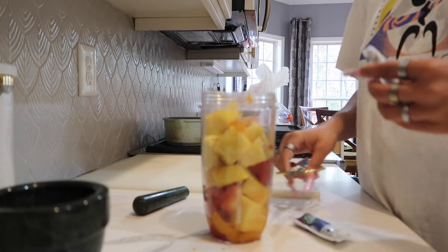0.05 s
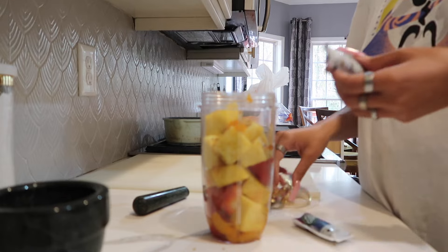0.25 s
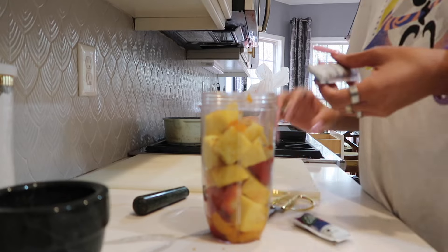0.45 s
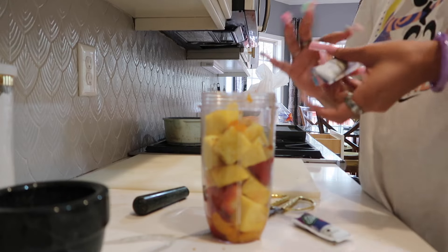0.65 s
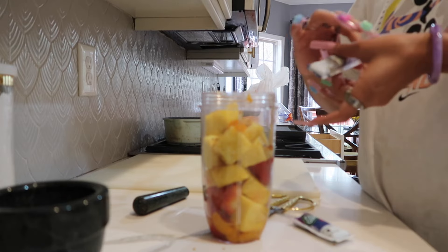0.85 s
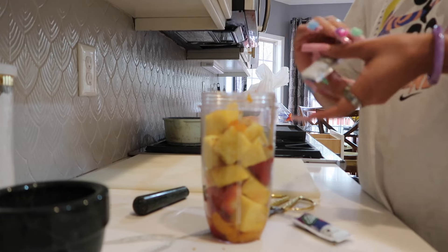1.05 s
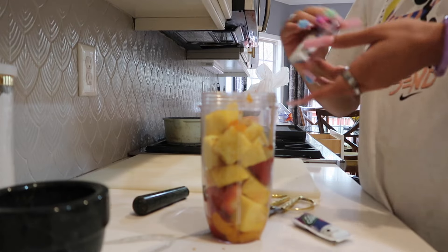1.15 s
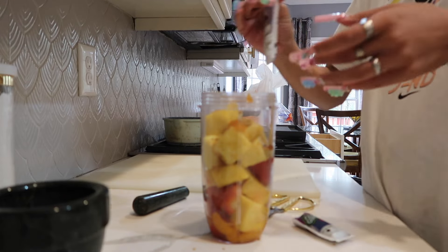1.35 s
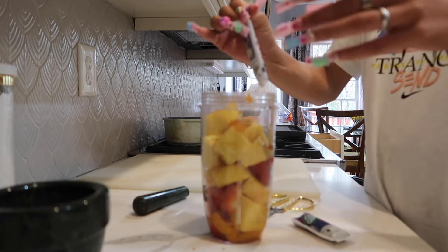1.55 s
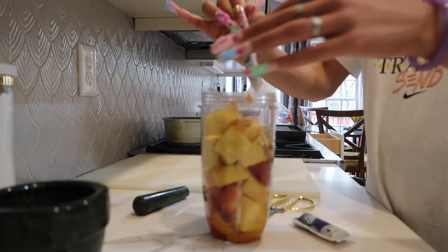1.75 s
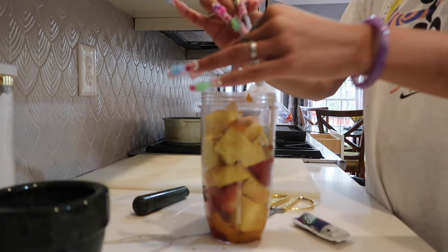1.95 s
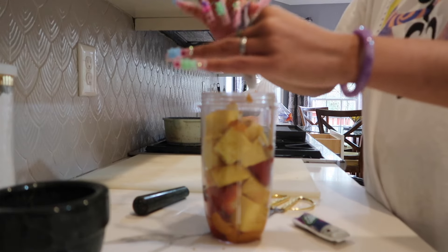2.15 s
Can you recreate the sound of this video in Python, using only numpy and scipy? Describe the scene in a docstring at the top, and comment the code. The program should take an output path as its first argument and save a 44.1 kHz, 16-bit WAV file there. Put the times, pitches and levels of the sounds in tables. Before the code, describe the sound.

Scissors set down on a kitchen counter with bright clinks, followed by light foil ticks.

```python
"""A live kitchen with a low appliance hum, heard by two closely spaced microphones.
Metal scissors clink in the hand and are laid on the stone counter: they touch, clatter flat
and settle, the steel ringing and knocking the slab. Then long nails and rings tap on a small
foil pouch, which rustles faintly; one crease snaps over."""
import sys
import numpy as np
from scipy import signal
from scipy.fft import rfft, irfft, next_fast_len
from scipy.io import wavfile

SR = 44100
rng = np.random.default_rng(int(sys.argv[2]) if len(sys.argv) > 2 else 0)


def wrap_up_sound(samples):
    """Save the sound to the file named by the first command line argument, as 16-bit audio."""
    columns = np.atleast_2d(samples).T
    # keep every value between -1 and 1, then stretch to whole-number steps
    tamed = np.clip(columns, -1, 1)
    steps = np.round(tamed * 32767).astype(np.int16)
    wavfile.write(sys.argv[1], SR, steps)


N = 97020

# air noise spectrum: freq_hz, gain_db
AIR_COLOUR = [(20, -14), (45, -8.5), (80, 5), (115, -3.5), (250, -2.5), (450, -5.5), (800, -13),
              (1600, -16), (4000, -21.5), (8000, -31), (11000, -31.5), (15000, -56.5)]
# air noise envelope: time_s, level_db
AIR_LEVEL = [(0, -49.5), (.6, -62.5), (.95, -55.5), (1.3, -52), (1.8, -52.5), (2.2, -51)]
# appliance hum: pitch_hz, level_db
HUM_PARTIALS = [(82, -67), (246, -70.5)]
# side against mid in diffuse sound: freq_hz, gain_db
SIDE_COLOUR = [(60, -25.5), (110, -22.5), (200, -12), (380, -4.5), (800, 0.5), (3000, -0.5), (8000, 2.5),
               (14000, -11.5)]
# reverb decay: freq_hz, t60_s
REVERB_DECAY = [(100, 0.52), (400, 0.6644), (1500, 0.6), (4000, 0.5146), (8000, 0.51), (14000, 0.54)]
# reverb spectrum: freq_hz, gain_db
REVERB_COLOUR = [(80, -4.5), (300, 5.5), (1000, -3.5), (2500, -2), (5000, -3.5), (7500, 2), (10000, -5),
                 (12000, 5.5), (15000, -11.5)]
# counter and tile reflections: freq_hz, gain_db
REFLECTION_COLOUR = [(60, -29.5), (500, -19.5), (1200, -13), (2500, -2.5), (5000, 9.5), (8000, 4.5),
                     (12000, -0.5)]
# phase lead of the left microphone: freq_hz, lead_rad
MIC_LEAD = [(100, 0), (2840, 0), (3620, .1), (4050, .8), (4480, .45), (5250, 1.5), (6120, 1.7), (8270, 2.6),
            (11000, 2.9), (15600, 3.1)]

# foil rustle spectrum: freq_hz, gain_db
RUSTLE_COLOUR = [(500, -22.5), (1500, -0.5), (3500, -2), (7000, -1), (10000, -11.5), (15000, -5)]
# foil rustle envelope: time_s, level_db
RUSTLE_LEVEL = [(0, -56.5), (.82, -83), (.87, -56), (.97, -73), (1.18, -68.5), (1.28, -53.5), (1.4, -71.5),
                (1.6, -61.5), (1.75, -72), (2.0, -83), (2.2, -74.5)]
# taps on the pouch: start_s, snap_db, nail_db, centre_hz, tick_db, chatter_s
POUCH_TAPS = [ (0.7341, -51.5, -60.5, 4400, -46, 0.0045), (1.047, -55, -61.5, 2866, -86, 0.0019),
              (1.0696, -49.5, -62.5, 3130, -57, 0.0071), (1.1945, -66.5, -74, 5000, -47.5, 0.012),
              (1.4060, -39, -56, 2500, -39, 0.0023), (1.4076, -35, -54, 5000, -38, 0.007),
              (1.6514, -43, -44.5, 6680, -65.5, 0.0012), (1.6782, -58.5, -49.5, 3870, -59.5, 0.0017),
              (1.9227, -50.5, -46, 2740, -49, 0.0012), (2.0232, -55.5, -68, 3460, -59, 0.0056),
              (2.0610, -47, -75, 2970, -45, 0.0066)]
# scissors on stone: start_s, knock_db, steel_db, clack_db, cutoff_hz, thud_db, tick_db, chatter_s
COUNTER_BLOWS = [ (.2240, -36, -36, -45.5, 2487, -57, -39.5, 0.009),
                 (0.2272, -20.5, -32.5, -34.5, 3020, -24.5, -26, 0.0016),
                 (0.2313, -24, -30.5, -27, 7500, -34, -22.5, 0.0071),
                 (0.2424, -59, -46, -34, 6140, -40.5, -31, 0.012),
                 (0.2936, -45, -46.5, -37.5, 2550, -41, -45.5, 0.009),
                 (.3000, -25.5, -34.5, -29, 3020, -33.5, -27.5, 0.015),
                 (0.3048, -26.5, -36, -38, 3504, -41, -31.5, 0.0093),
                 (.3330, -31.5, -33, -25, 990, -38.5, -39.5, 0.002),
                 (.3350, -43, -36.5, -31, 3000, -35, -15.5, 0.006),
                 (0.3444, -27.5, -27.5, -26, 1498, -42.5, -59.5, 0.0015),
                 (.3460, -23.5, -15.5, -13, 5605, -59, -44.5, 0.001),
                 (.3510, -20.5, -22, -24, 2190, -50, -45, 0.0029),
                 (.3563, -26.5, -22.5, -22, 2640, -38.5, -55.5, 0.0036),
                 (0.4201, -24.5, -30, -29, 4620, -40, -26, .003),
                 (.4235, -28.5, -28, -28.5, 4400, -62, -42.5, 0.0017),
                 (0.4531, -30, -36.5, -36.5, 2220, -46, -43, 0.0043),
                 (.4800, -36, -55, -49, 2390, -41.5, -70, .008),
                 (.5320, -52, -63, -30.5, 1710, -38, -54, 0.0088),
                 (0.5404, -36.5, -47.5, -28, 2780, -33, -23.5, 0.015),
                 (.5520, -55, -72, -30, 2560, -72, -31.5, 0.022),
                 (.5700, -37, -97, -30.5, 2100, -41.5, -43, 0.027),
                 (.5920, -44, -49.5, -37.5, 2210, -47, -40.5, 0.035)]
# blade on blade: start_s, level_db
BLADE_CLASHES = [(.3466, -18), (0.355, -28), (0.3897, -35.5), (.4210, -22.5)]

# contact noise spectra: freq_hz, gain_db
CLACK_COLOUR = [(150, -32.5), (330, -17.5), (520, -5), (750, -3.5), (1400, -4), (2200, 1.5), (2850, -3.5),
                (4200, -2.5), (5000, -9), (6400, -3.5), (9000, -16), (15000, -25.5)]
THUD_COLOUR = [(25, -25), (45, -13.5), (75, 2), (105, -3), (150, -1.5), (230, 0), (300, -11.5), (410, -0.5),
               (600, -13.5), (1500, -32.5), (5000, -57)]
TICK_COLOUR = [(1500, -35), (4000, -10.5), (6000, -6), (8000, -3.5), (10500, 3.5), (12000, -3), (13500, -6),
               (16000, -19)]

# resonances: pitch_hz, level_db, t60_s
FINGERNAIL_MODES = [(1745, -6, 0.015), (2990, 2.5, 0.014), (3220, -0.5, 0.023), (4470, -26, 0.015),
                    (5170, -14.5, 0.013), (6944, 1.5, 0.014)]
POUCH_MODES = [(1940, -7, 0.0054), (3020, 2, .014), (4540, -3, 0.013), (5140, -2, 0.013), (5550, -3, 0.013),
               (6800, 0, 0.015), (7670, 1, 0.0093)]
STONE_MODES = [(399, -13.5, 0.04), (520, -14, .04), (667, -25, 0.045), (855, -14, 0.22), (984, -5, .07),
               (1065, 3.5, 0.028), (1150, -5, 0.021)]
STEEL_CLINK_MODES = [(2120, -4, 0.045), (2457, -8.5, .025), (3000, -4, 0.01), (5110, -2, 0.025),
                     (5170, -10.5, 0.14), (7600, 1, 0.045), (8000, -9, 0.06), (10200, -9.5, 0.05),
                     (11400, 2.5, .045)]  # above the counter
STEEL_HELD_MODES = [(1320, -3.5, .035), (2117, -4.5, 0.095), (2979, 0, 0.084), (3500, -7.5, 0.057),
                    (4225, -7, .015), (4700, -7.5, .04)]  # touching down, still in the fingers
STEEL_LOOSE_MODES = [(1396, -1, 0.055), (1617, -6.5, 0.06), (1796, -8, 0.08), (2064, -15.5, 0.3),
                     (2240, 2.5, 0.033), (2477, 0, 0.034), (3340, -2, 0.02), (4060, -18.5, .1),
                     (5880, -8, .03)]  # lying on the stone
STEEL_CLASH_MODES = [(3010, -1, .04), (3340, 0, 0.025), (3720, -2.5, .02), (4214, 3, .02)]  # blade on blade

CLACK_T60_S, THUD_T60_S, TICK_T60_S, SNAP_T60_S = 0.014, 0.1, 0.017, 0.037
LET_GO_S, LOOSE_WAVER = 0.32, 0.014  # once let go, the blades rattle and their pitch wavers


def undb(db):
    """Decibels to gain."""
    return 10 ** (np.asarray(db) / 20)


def on_log(points, hz):
    """Interpolate a table on a log-frequency axis."""
    freq_hz, values = np.array(points, float).T
    return np.interp(np.log(np.maximum(hz, 1)), np.log(np.maximum(freq_hz, 1)), values)


def over_time(points):
    """Gain per sample from time_s, level_db."""
    return undb(np.interp(np.arange(N) / SR, *np.array(points, float).T))


def colour(points):
    """Gain function from freq_hz, gain_db."""
    return lambda hz: undb(on_log(points, hz))


def shape(x, gain, size=131072):
    """Minimum-phase filter of magnitude gain(hz)."""
    cepstrum = irfft(np.log(gain(np.fft.rfftfreq(size, 1 / SR)) + 1e-9))
    cepstrum[1:size // 2] *= 2
    cepstrum[size // 2 + 1:] = 0
    return irfft(rfft(x, size) * np.exp(rfft(cepstrum)))[..., :x.shape[-1]]


def fade(t60_s, size=16384):
    """Exponential decay."""
    return np.exp(-np.log(1000) * np.arange(size) / SR / max(t60_s, 1e-4))


def at_level(x, level_db):
    """Scale to the energy of 10 ms at level_db."""
    return x * undb(level_db) / np.sqrt(np.sum(x ** 2) / (SR / 100))


def add(track, start_s, x):
    """Mix x in at start_s."""
    i = max(int(start_s * SR), 0)
    track[i:i + len(x)] += x[:N - i]


def burst(gain, t60_s, chatter_s, level_db):
    """Dense, damped, unpitched vibration, lengthened by chatter."""
    envelope = fade(np.hypot(t60_s, np.log(1000) * chatter_s))
    noise = envelope * rng.standard_normal(len(envelope))
    whitened = irfft(np.exp(1j * np.angle(rfft(noise))))
    return at_level(shape(whitened * envelope ** 0.25, gain, size=16384), level_db)


def ring(modes, chatter_s, level_db, waver=0):
    """Struck modes; chatter slows the attack, waver is the fractional pitch wander."""
    t = np.arange(16384) / SR
    knots_s = np.arange(256) * 0.004
    body = 0
    for hz, mode_db, t60_s in modes:
        scatter, detune, phase = rng.standard_normal(3)  # each blow lands on a different point
        wander = np.interp(t, knots_s, rng.standard_normal(len(knots_s)))
        pitch_hz = hz * (1 + 0.007 * detune + waver * wander)
        tone = np.sin(2 * np.pi * (np.cumsum(pitch_hz) / SR + phase))
        body += undb(mode_db + 2 * scatter) * fade(t60_s) * tone
    attack = 1 - np.exp(-t / (0.083 * chatter_s))
    return at_level(body * attack, level_db)


def diffuse(side_trim_db):
    """Stereo noise arriving from all around."""
    mid, side = rng.standard_normal((2, N))
    side = undb(side_trim_db) * shape(side, colour(SIDE_COLOUR))
    return np.array([mid + side, mid - side])


def room_tone():
    """Soft air noise and appliance hum."""
    t = np.arange(N) / SR
    air = shape(diffuse(side_trim_db=0), colour(AIR_COLOUR))
    hum = sum(undb(level_db) * np.sqrt(2) * np.sin(2 * np.pi * (pitch_hz * t + rng.random()))
              for pitch_hz, level_db in HUM_PARTIALS)
    return air / air.std() * over_time(AIR_LEVEL) + hum


def kitchen_response(onset_s=0.0023):
    """Diffuse reverb: builds fast, lasts longest in the low mids."""
    t, hz = np.arange(N) / SR, np.fft.rfftfreq(N, 1 / SR)
    spectrum = rfft(diffuse(side_trim_db=-22))
    tail = 0
    for centre_hz, t60_s in REVERB_DECAY:
        band = on_log([(f, f == centre_hz) for f, _ in REVERB_DECAY], hz)
        tail += irfft(spectrum * band, N) * fade(t60_s, size=N)
    tail *= 1 - np.exp(-(t / onset_s) ** 2)
    tail *= 1 + undb(2) * fade(t60_s=0.1, size=N)  # first returns from cabinets and wall
    return shape(tail / np.linalg.norm(tail[0]), colour(REVERB_COLOUR))


def with_reflections(x):
    """Direct sound plus counter and tile reflections, different at each microphone."""
    envelope = fade(t60_s=0.012)
    response = envelope * rng.standard_normal(len(envelope))
    reflected = signal.fftconvolve(x, response / np.linalg.norm(response))[:N]
    side = undb(-13) * shape(reflected, colour(REFLECTION_COLOUR))
    return np.array([x + side, x - side])


def foil_rustle(grain_samples=64):
    """Faint foil rustle: noise whose level jumps from grain to grain."""
    log_gain = 0.25 * np.repeat(rng.standard_normal(N // grain_samples + 1), grain_samples)[:N]
    grains = shape(rng.standard_normal(N) * np.exp(log_gain), colour(RUSTLE_COLOUR))
    return grains / grains.std() * over_time(RUSTLE_LEVEL)


def pouch_taps(half_width_oct=0.81, crease_s=1.4062):
    """Nails strike the foil and ring briefly; one crease snaps over."""
    out = np.zeros(N)
    for start_s, snap_db, nail_db, centre_hz, tick_db, chatter_s in POUCH_TAPS:
        band = lambda hz: 1 / (1 + (np.log2((hz + 1) / centre_hz) / half_width_oct) ** 2)
        snap = burst(band, SNAP_T60_S, chatter_s, snap_db)
        nail = ring(FINGERNAIL_MODES, chatter_s, nail_db)
        tick = burst(colour(TICK_COLOUR), TICK_T60_S, chatter_s, tick_db)
        add(out, start_s, snap + nail + tick)
    add(out, crease_s, ring(POUCH_MODES, chatter_s=0.0013, level_db=-35.5, waver=0.014))
    return out


def scissors_clink(start_s=0.0063):
    """The steel rings and ticks once in the hand."""
    out = np.zeros(N)
    steel = ring(STEEL_CLINK_MODES, chatter_s=0.006, level_db=-30, waver=0.0039)
    tick = burst(colour(TICK_COLOUR), TICK_T60_S, chatter_s=0.024, level_db=-31)
    add(out, start_s, steel + tick)
    return out


def scissors_clatter():
    """Each blow rings the steel, knocks the slab and thuds the cabinet; the loose blades clash."""
    out = np.zeros(N)
    for start_s, knock_db, steel_db, clack_db, cutoff_hz, thud_db, tick_db, chatter_s in COUNTER_BLOWS:
        if start_s < LET_GO_S:
            steel = ring(STEEL_HELD_MODES, chatter_s, steel_db)
        else:
            steel = ring(STEEL_LOOSE_MODES, chatter_s, steel_db, LOOSE_WAVER)
        knock = ring(STONE_MODES, chatter_s, knock_db, waver=0.013)
        contact = lambda hz: colour(CLACK_COLOUR)(hz) / np.hypot(1, (hz / cutoff_hz) ** 2)
        clack = burst(contact, CLACK_T60_S, chatter_s, clack_db)
        thud = burst(colour(THUD_COLOUR), THUD_T60_S, chatter_s, thud_db)
        tick = burst(colour(TICK_COLOUR), TICK_T60_S, chatter_s, tick_db)
        add(out, start_s, knock + steel + clack + thud + tick)
    for start_s, level_db in BLADE_CLASHES:
        clash = ring(STEEL_CLASH_MODES, chatter_s=0.0015, level_db=level_db, waver=LOOSE_WAVER)
        add(out, start_s, clash)
    return out


def scene():
    """Scissors and pouch close by, the kitchen around them."""
    clatter, clink = scissors_clatter(), scissors_clink()
    pouch = foil_rustle() + pouch_taps()
    close = with_reflections(clatter + clink + pouch)
    send = undb(-5.5) * clatter + undb(-8) * clink + undb(-7.5) * pouch
    reverb = signal.fftconvolve(send[None], kitchen_response(), axes=1)[:, :N]
    return close + reverb + room_tone()


def record(dry):
    """Microphone pair, out of phase in the treble; clip at full scale, then low-pass."""
    size = next_fast_len(2 * N)
    lead_rad = on_log(MIC_LEAD, np.fft.rfftfreq(size, 1 / SR))
    rotation = np.exp(0.5j * np.array([lead_rad, -lead_rad]))
    pair = irfft(rfft(dry, size) * rotation, size)[:, :N]
    lowpass = signal.ellip(8, 0.2, 70, 15900, fs=SR, output="sos")
    return signal.sosfilt(lowpass, np.clip(pair, -1, 1))


dry = scene()
out = record(dry)
wrap_up_sound(out)
```